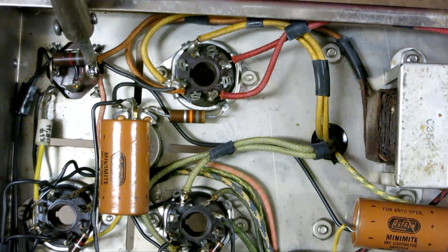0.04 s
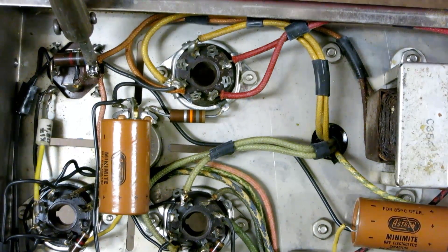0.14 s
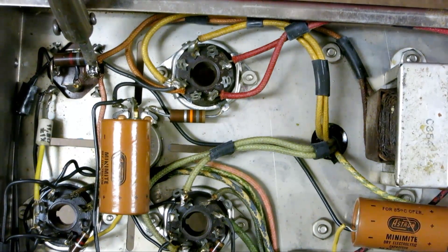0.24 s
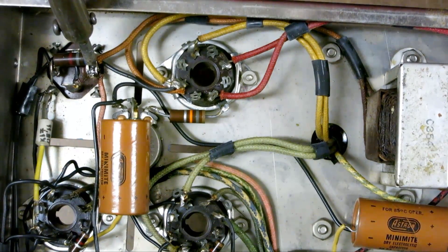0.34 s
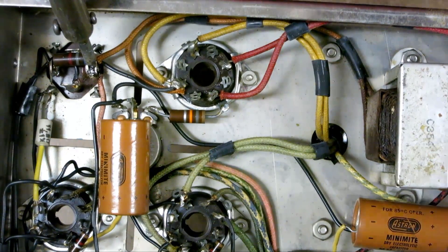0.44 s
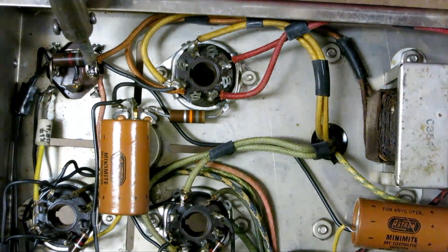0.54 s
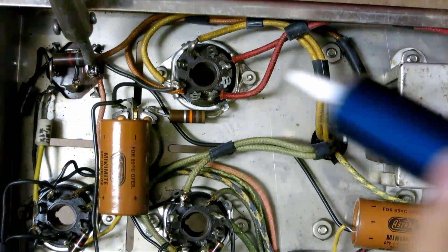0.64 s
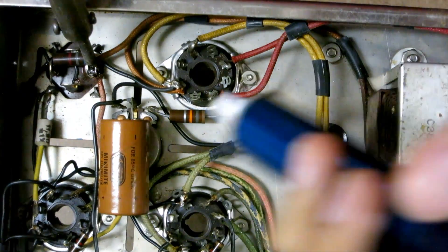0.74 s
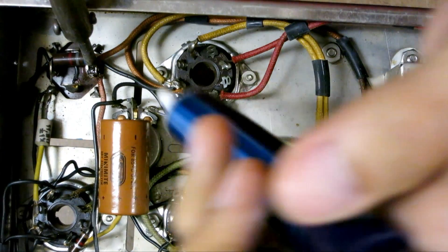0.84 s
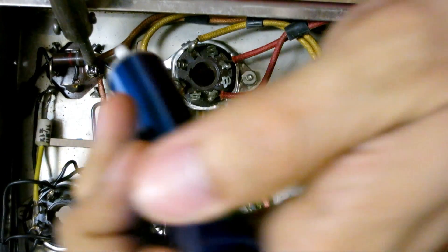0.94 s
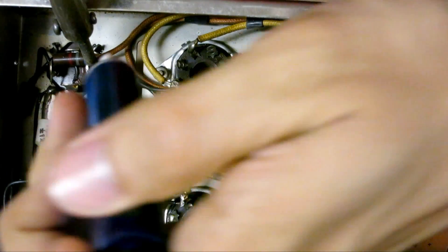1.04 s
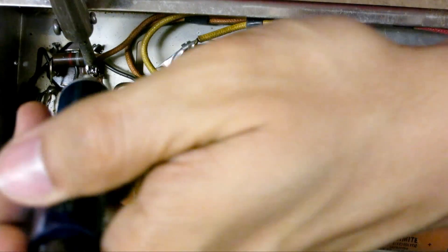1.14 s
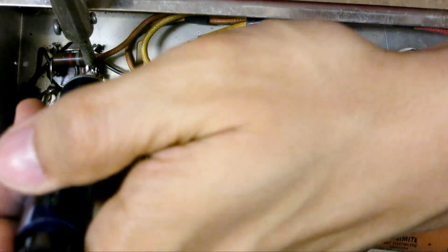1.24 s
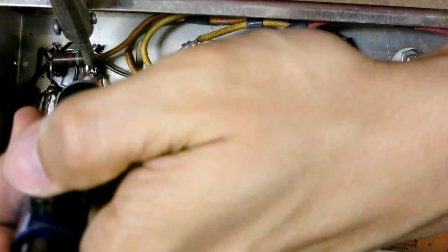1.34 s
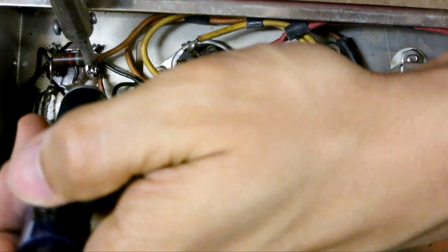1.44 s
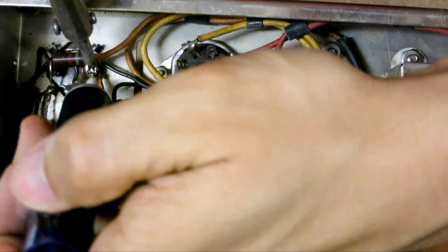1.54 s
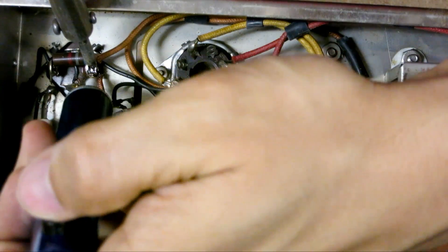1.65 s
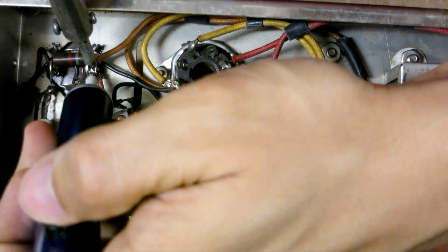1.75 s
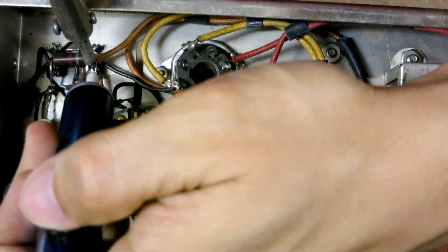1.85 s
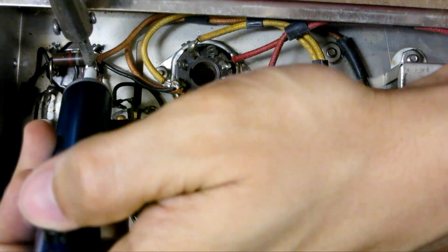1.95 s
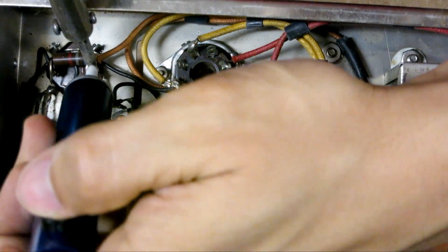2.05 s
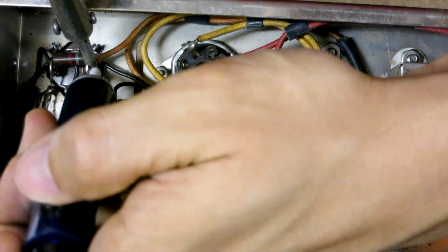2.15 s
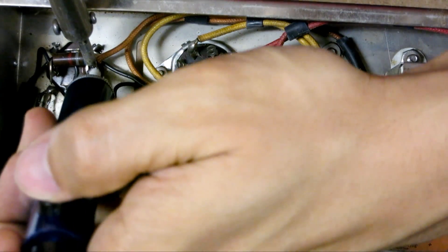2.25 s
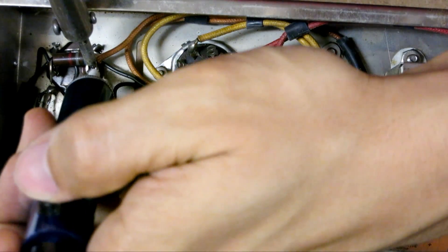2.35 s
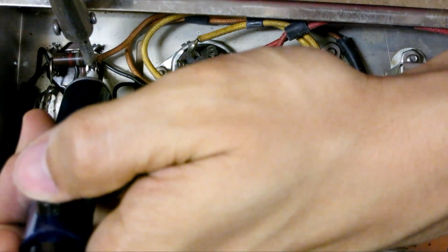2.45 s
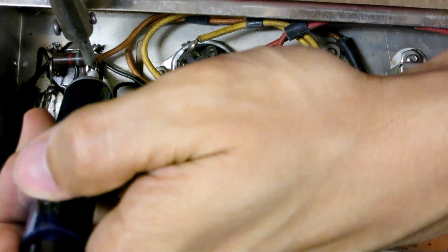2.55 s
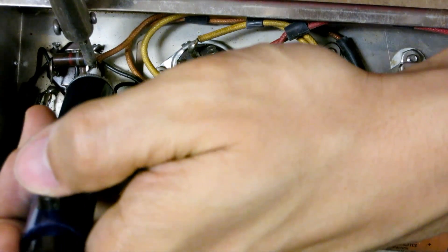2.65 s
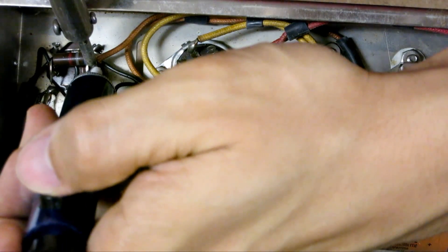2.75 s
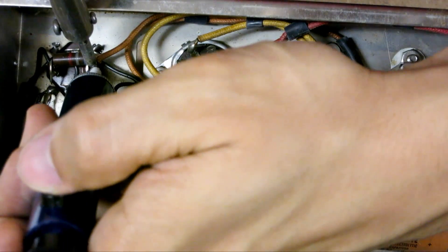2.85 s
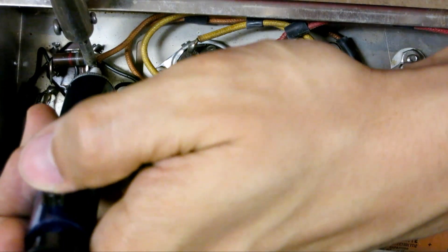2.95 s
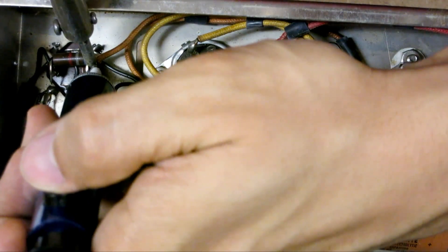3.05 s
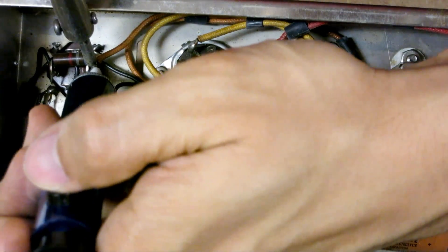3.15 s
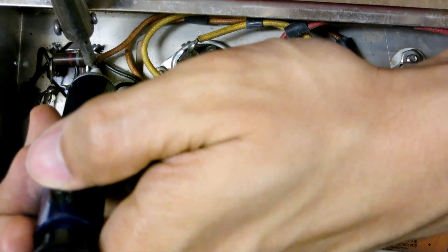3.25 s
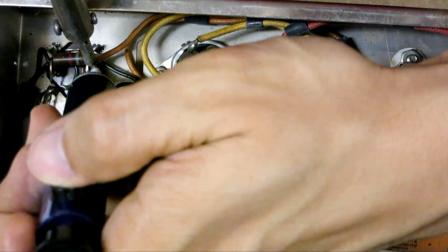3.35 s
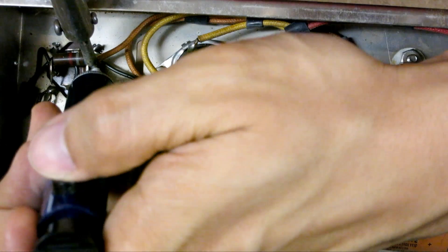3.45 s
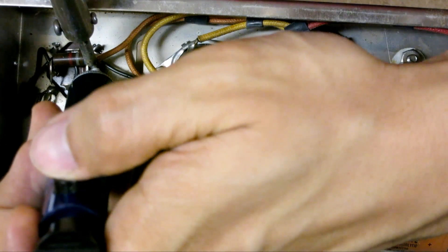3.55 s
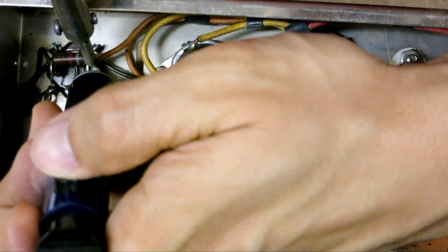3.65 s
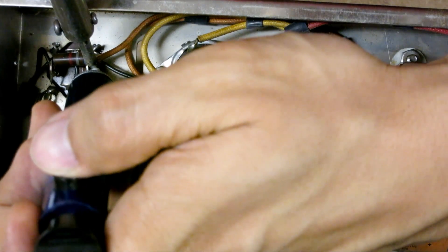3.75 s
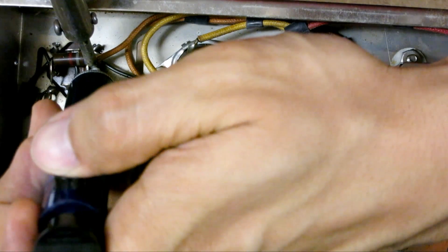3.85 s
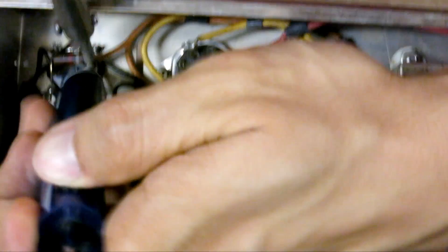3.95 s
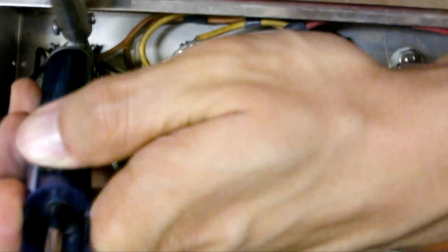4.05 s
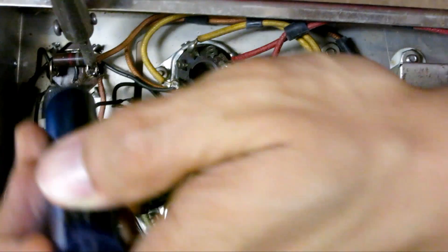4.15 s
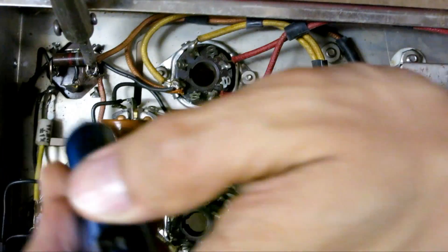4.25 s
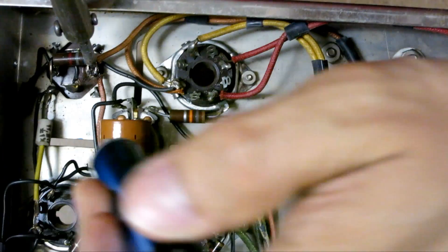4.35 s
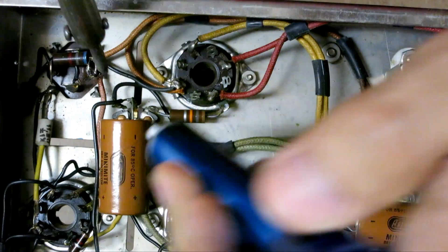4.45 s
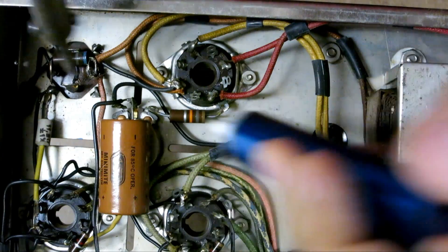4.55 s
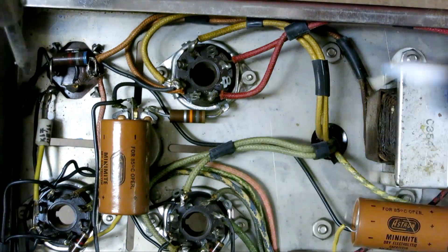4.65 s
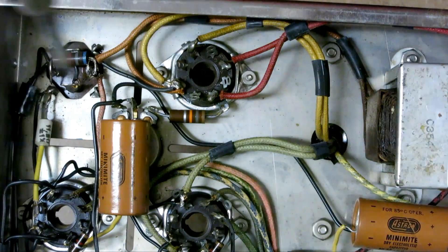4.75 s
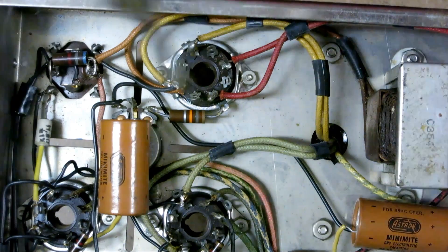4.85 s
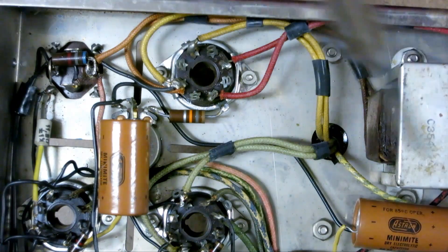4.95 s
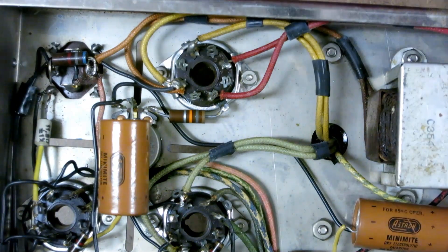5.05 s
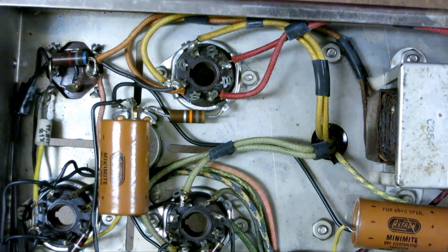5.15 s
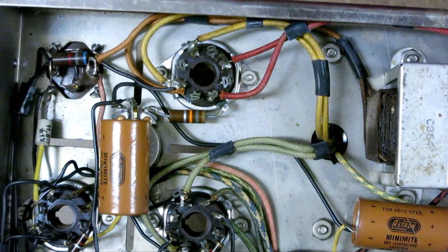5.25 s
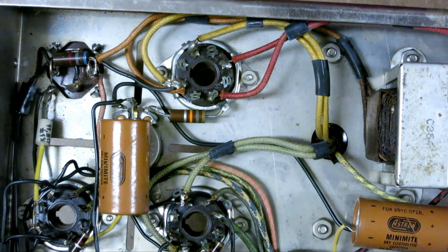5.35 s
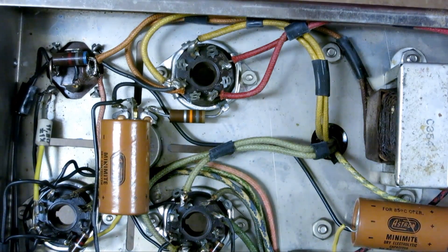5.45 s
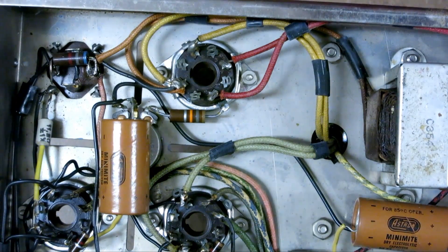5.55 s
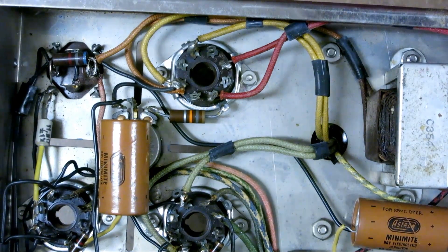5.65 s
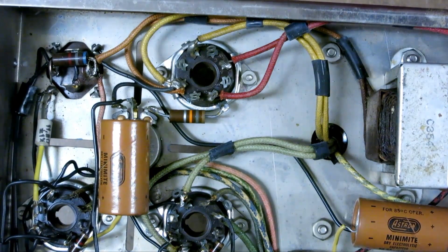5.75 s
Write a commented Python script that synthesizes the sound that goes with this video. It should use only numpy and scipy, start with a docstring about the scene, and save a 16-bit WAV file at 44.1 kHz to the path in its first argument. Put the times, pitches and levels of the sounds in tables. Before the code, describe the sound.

Low room hush with fine hiss, a metallic tap, then two and a half seconds of tiny ticks from a focusing lens. The pump snaps once, far louder than everything else, with a faint shimmering spring tail. The background dips briefly, loose parts rattle, and quiet clicks, rustling and delicate ticks finish it. Very close microphone, barely any room.

```python
"""Desoldering pump at close range

A spring-loaded pump on a hot joint in a metal chassis fires once. Contacts are decaying noise and modal rings;
the piston's scrape is shaped noise, its stop one pressure swing, and the spring a set of close modes.
Before and after come lens ticks as a camera hunts for focus, faint scattered ticks, taps, clatter, rustles, a tone.
Workshop hush is shaped noise, a faint diffuse tail is the room, and the gain ducks at the snap."""
import sys
import numpy as np
from scipy import signal
from scipy.fft import rfft, irfft, next_fast_len
from scipy.io import wavfile
from scipy.ndimage import uniform_filter1d

SR = 44100
rng = np.random.default_rng(int(sys.argv[2]) if len(sys.argv) > 2 else 0)


def wav_out(sig):
    """Save sig, one row per channel (or a flat mono array), as 16-bit PCM at SR to the path in sys.argv[1]."""
    wavfile.write(sys.argv[1], SR, np.round(np.clip(np.atleast_2d(sig).T, -1, 1) * 32767).astype(np.int16))


N = 255603
TIME = np.arange(N) / SR

# Workshop hush, louder while the hand is close: t/s, level/dB
HUSH_LEVEL = [(0.3, -65.5), (0.6, -64), (1.25, -62.5), (1.7, -60), (3.948, -59), (4.251, -65.5),
              (5.35, -66.5), (5.8, -63.5)]
# Relative spectral density of the low hush and of the fine hiss: f/Hz, density/(dB per Hz)
HUSH_SPECTRUM = [(25, -19.5), (50, -2), (85, 2), (190, -4), (290, -3.5), (550, -7), (720, -9),
                 (1220, -12.5), (1600, -16), (2000, -16), (2700, -23), (3050, -24), (3300, -28),
                 (8000, -34.5)]
HISS_SPECTRUM = [(1000, -18.5), (3300, -9.5), (5000, -5.5), (9000, -6.5), (14000, -7.5), (15700, -17),
                 (16200, -31)]
# Narrow humps in the hush: f/Hz, width at half amplitude/Hz, level before the swell/dB
HUSH_HUMPS = [(79, 74, -79), (265, 69, -86.5), (976, 44, -80.5), (1236, 120, -77), (2937, 90, -85)]
# Steps of the focusing lens: t/s, peak of housing ring/dB, tilt/(dB per octave), gear bite re peak/dB
FOCUS_STEPS = [(0.418, -48.5, -1, -14), (1.254, -48, 4.5, -12), (1.421, -46.5, 2.5, -13),
               (1.5456, -38.5, -6.5, -15), (1.67, -42.5, 2, -14), (1.921, -38, 1.5, -19),
               (2.046, -35.5, -5, -14.5), (2.213, -33.5, -5, -14), (2.379, -34, -1.5, -12.5),
               (2.5057, -39, 3, -22), (2.6718, -42, 4, -10), (2.839, -42, 3, -15), (3.006, -40.5, 0, -20),
               (3.1721, -39, 2, -22), (3.298, -47.5, -6, -16), (3.423, -43.5, -4.5, -8),
               (3.84, -46, 4.5, -10), (3.964, -47.5, 6, -12), (4.417, -47.5, 4.5, -22),
               (4.923, -45, -5, -12.5), (5.417, -42.5, -2, -11), (5.507, -46.5, 3, -15),
               (5.591, -42, -4, -14)]
# Modes of the lens housing before tilt and scatter: f/Hz, relative level/dB, T60/s
LENS_MODES = [(555.4, -15, 0.047), (796, 0.5, 0.049), (960, -3, 0.052), (1152, 5, 0.018),
              (1364, -2.5, 0.029), (1566, -10.5, 0.014), (1974, -2, .028), (2998, -22, 0.014),
              (3450, -21, .018), (3950, -19, 0.014), (4217, -18.5, 0.014), (6400, -21, 0.0069)]
# Relative spectrum of the room's answer: f/Hz, level/dB
ROOM_SPECTRUM = [(80, 9), (200, -1), (320, 7), (420, 3.5), (900, 0.5), (1800, -1), (2600, 0), (3400, -5),
                 (4400, -5), (5200, 0), (5900, -3), (6700, 0), (7800, 0.5), (9000, -2), (10400, -3),
                 (12500, -3), (14600, -1), (15800, -12.5)]
# Reverberation time of the room: f/Hz, T60/s
ROOM_T60 = [(100, .7), (500, .45), (2000, .42), (5000, .46), (8000, .42), (15000, .36)]
# Knocks on the chassis: t/s, peak level of the ring/dB
KNOCKS = [(0.4305, -36), (5.425, -48)]
# Modes of the chassis sheet metal: f/Hz, relative level/dB, T60/s
CHASSIS_MODES = [(209, -13, .12), (274, -12, 0.15), (379, -8.5, 0.14), (621, -8, 0.11), (755, -9.5, 0.12),
                 (1010, -4, 0.1), (1620, 1, .045), (1840, 0.5, 0.03), (2430, -4, 0.053), (3380, -47, 0.023),
                 (4000, -18.5, 0.071), (7400, -22, .05)]
# Light taps of finger, nozzle and iron on the pump, wires and lugs:
# t/s, approximate peak level/dB, strongest f/Hz, spread/octaves, T60/s
TAPS = [(0.4335, -44, 1700, .1, .03), (0.4345, -46, 2470, 0.042, 0.033), (0.4375, -44, 800, 0.41, .04),
        (5.428, -49, 2600, 0.46, 0.018), (5.563, -53, 2500, .25, .04), (5.574, -52, 4800, .5, .03),
        (0.7306, -53, 5500, 0.54, 0.11), (0.731, -51, 8330, .07, .06), (3.255, -57, 2200, .6, 0.024),
        (3.274, -48, 1500, 0.6, .04), (3.311, -47, 1200, 0.45, 0.027), (3.351, -53, 3000, 1.2, .012),
        (3.913, -27.5, 7900, 0.93, 0.0059), (3.914, -38.5, 1950, 0.62, 0.013), (4.04, -45, 7000, 1, .008),
        (4.059, -36, 7000, 1, .01), (4.122, -40.5, 9160, 0.55, 0.012), (4.365, -51, 9520, 0.54, 0.026),
        (4.388, -49.5, 9500, 0.5, 0.018), (4.418, -54, 7400, .2, 0.024), (4.429, -55, 11970, 0.42, .006),
        (4.445, -55, 11100, .4, 0.013), (4.592, -49, 7000, 0.73, 0.014), (5.4243, -42, 1000, 0.39, 0.039),
        (5.4172, -47, 3000, 1.6, 0.029), (5.6204, -52, 6050, 0.28, 0.047), (5.6625, -48, 7300, .6, .022),
        (5.682, -51, 13500, .4, .015), (5.6985, -46.5, 6200, 0.27, 0.043), (5.699, -53, 13000, .4, .04),
        (5.7296, -45, 6800, 0.38, 0.012), (5.7452, -43.5, 8000, 0.94, 0.064),
        (5.756, -45, 12000, 0.23, 0.054)]
# Modes of the nozzle as it leaves the lug: f/Hz, relative level/dB, T60/s
NOZZLE_MODES = [(590, -15, 0.025), (2380, -3, .015), (2770, 1, .016), (4240, -9, .014), (5100, -1, 0.013),
                (5550, -1.5, .014), (6860, -12, .012)]
# Clatter of the loose pump as it is lifted away: t/s, approximate peak level/dB, tilt/(dB per octave), T60/s
CLATTERS = [(4.189, -46, -2, .015), (4.1943, -34, 2, .011), (4.2056, -35, 1, 0.011),
            (4.2836, -34.5, 2.5, 0.013), (4.307, -47, -2, .012), (4.822, -47.5, 1.5, 0.012)]
# Relative spectral density of the clatter before tilt: f/Hz, density/(dB per Hz)
CLATTER_SPECTRUM = [(1000, -22), (1900, -2), (2800, -2.5), (3500, -7), (4400, 1), (5400, 3.5), (6300, -1),
                    (7500, -5), (9200, -4), (10800, -15), (13000, -14), (15000, -24)]
# Soft rustles as tools are handled: middle t/s, length/s, level/dB
RUSTLES = [(0.53, 0.092, -70), (0.83, 0.11, -73), (1.35, 0.058, -69), (4.414, .02, -60.5),
           (4.74, 0.13, -72.5), (4.875, 0.02, -69), (5.06, 0.093, -76), (5.46, 0.13, -73),
           (5.571, 0.036, -60.5), (5.66, 0.36, -63.5), (5.762, 0.033, -67.5)]
# Relative spectral density of the rustles: f/Hz, density/(dB per Hz)
RUSTLE_SPECTRUM = [(300, -3), (1500, -2), (2600, 0), (3400, -6), (4800, -2.5), (6500, -3), (10000, -4),
                   (14000, -4), (15500, -8.5)]
# Fingers sliding on the barrel:
# middle t/s, length/s, level/dB, f at the middle/Hz, glide/(octaves per s), bandwidth of each pole/Hz
FINGER_RUBS = [(.54, .08, -78, 11500, 0, 2500), (0.828, .05, -77, 4100, 1, 700),
               (.835, .06, -72.5, 10100, -1, 1200), (.825, .07, -76, 13200, 0, 600),
               (1.35, .06, -75, 9800, 0, 1800), (1.365, .04, -78, 13400, 0, 600),
               (4.734, 0.081, -76, 8040, -.5, 400), (4.876, 0.026, -73, 9000, 0, 351),
               (5.06, .1, -76, 13000, 0, 2500)]
# Soft swells of low noise: middle t/s, length/s, level/dB
LOW_SWELLS = [(0.774, 0.23, -67), (1.505, 0.077, -60.5), (1.68, 0.21, -61), (3.547, 0.018, -54.5),
              (5.045, 0.89, -71.5)]
# Steps in which the lens drive whines: t/s, level/dB
DRIVE_WHINES = [(1.422, -59), (1.926, -54), (2.51, -59), (2.672, -56), (2.84, -54)]
# Modes of the lens drive before scatter: f/Hz, relative level/dB, T60/s
DRIVE_MODES = [(1930, 2, .02), (3350, -4, 0.0076), (3947, -1, 0.014), (5280, -1.5, .012),
               (6380, -2.5, 0.015), (8070, -4, .01)]
# Contacts inside the pump, from the latch to the last bounce:
# t/s, rattle level/dB, strongest f/Hz, spread/octaves, rattle T60/s, gain of barrel ring/dB
PUMP_CONTACTS = [(3.9842, -6, 9000, .6, .003, -24), (3.9876, -3.5, 9600, .1, .004, -16),
                 (3.9878, -8, 4450, .12, .005, -21), (3.9935, -17, 1900, .4, .005, -25),
                 (3.9984, -15, 2850, .22, .005, -20), (3.9987, -4, 12500, .35, .004, -23),
                 (4.0012, -13, 11000, .4, .007, -25), (4.0042, -9, 10500, .8, .005, -23),
                 (4.0146, -22, 1000, 1.2, .018, -35), (4.0152, -17.5, 8300, .28, .013, -29),
                 (4.016, -16, 5950, .07, .012, -19), (4.017, -23, 14600, .05, .012, -29)]
# Modes of barrel and piston before the contact's emphasis: f/Hz, relative level/dB, T60/s
BARREL_MODES = [(340, -20, .04), (580, -15, .04), (720, -17, .03), (1180, -8, .014), (1770, 0, .022),
                (2150, -8, .014), (2650, -4, .018), (4380, -3, .011), (5970, -2, .016), (7750, -3, .014),
                (9250, -3, .01), (10150, -2, .014), (12300, -5, .008), (14650, -1, .016)]
# Relative spectral density of scrape and rushing air: f/Hz, density/(dB per Hz)
SCRAPE_SPECTRUM = [(60, -8), (220, -9), (320, -2), (420, -7), (600, -4), (850, -14), (1150, -2), (1450, -5),
                   (1770, 2), (2300, -5), (2650, 0), (3650, -12), (4350, 0), (5050, -6), (5950, 2),
                   (6700, -11), (7750, 3), (8500, 0), (10100, 3), (11400, -7), (12400, -1), (13300, -8),
                   (14550, 5), (15200, -6), (15900, -15)]
# The piston's dead stop: t/s, f of pressure swing/Hz, half-length to 1/e/s, level/dB
PISTON_STOP = (3.9985, 1800, .00029, -3)
# Mode clusters of the freed spring: reference f/Hz, relative level/dB, T60/s
SPRING_MODES = [(1800, -7, .6), (1953, -3.5, .7), (2300, -5.5, .5), (2500, -8.5, .5), (2640, -5, .65),
                (5930, -3.5, .6), (7560, -6.5, .45), (7770, 0, .55), (7860, -3.5, .5), (10170, -3, .45),
                (12470, -7.5, .42), (14670, -2, .42)]
# Low bumps of the bench after the recoil: t/s, level/dB, f/Hz, T60/s
BENCH_THUDS = [(4.035, -53, 68.2, .16), (4.098, -46, 133, 0.088)]


def amp(db):
    """Level definition: converts decibels to an amplitude gain."""
    return 10 ** (np.asarray(db) / 20)


def unit(x):
    """Normalization: scales a signal to rms 1."""
    return x / np.sqrt(np.mean(x ** 2) + 1e-20)


def decay(t, t60):
    """Exponential decay: amplitude falls by 60 dB in each T60."""
    return np.exp(-np.log(1000) * t / t60)


def read(points, hz):
    """Logarithmic interpolation: reads a table on a log-frequency axis."""
    f, value = np.transpose(points)
    return np.interp(np.log(hz + 1), np.log(f + 1), value)


def colour(x, points):
    """Linear filtering: multiplies the spectrum of x by a tabulated gain and returns it at rms 1."""
    size = next_fast_len(len(x))
    gain = amp(read(points, np.fft.rfftfreq(size, 1 / SR)))
    return unit(irfft(rfft(x, size) * gain, size)[:len(x)])


def add(mix, s, sound):
    """Superposition: adds a sound to the mix in place at time s, in seconds."""
    part = mix[round(s * SR):][:len(sound)]
    part += sound[:len(part)]


def emphasis(hz, centre_hz, octaves):
    """Selective excitation: a hump around the frequency that a contact excites most."""
    return 1 / (1 + (np.log2((hz + 1) / centre_hz) / octaves) ** 2)


def hump_noise(size, centre_hz, octaves):
    """Band-shaped noise: white noise weighted by one hump in frequency."""
    hump = emphasis(np.fft.rfftfreq(size, 1 / SR), centre_hz, octaves)
    return irfft(rfft(rng.standard_normal(size)) * hump, size)


def bumps(rows, edge=2):
    """Amplitude modulation: smooth swells from rows of middle t/s, length/s, level/dB."""
    return sum(amp(db) * np.exp(-abs(2 * (TIME - s) / length) ** edge) for s, length, db in rows)


def envelope(start_s, attack_s, hold_s, t60):
    """Attack and decay: a straight rise, full level until hold_s after the start, then exponential decay."""
    t = TIME - start_s
    return np.clip(t / attack_s, 0, 1) * decay(np.maximum(t - hold_s, 0), t60)


def ring(modes, length_s):
    """Modal superposition: damped sines of a struck body, neighbouring modes starting in opposite directions."""
    t = TIME[:round(length_s * SR)]
    out = np.zeros(len(t))
    for k, (hz, db, t60) in enumerate(modes):
        out += (-1) ** k * amp(db) * decay(t, t60) * np.sin(2 * np.pi * hz * t)
    return out


def rattle(noise, t60):
    """Dense impacts: noise under an exponential decay, with a peak of about 1."""
    fall = decay(TIME[:len(noise)], t60)
    return .5 * unit(noise * fall) * np.sqrt(np.mean(fall ** 2))


def crack(centre_hz, octaves, t60, size=4096):
    """Broadband contact: the dense, quickly dying rattle of a hard contact, with a peak of about 1."""
    return rattle(hump_noise(size, centre_hz, octaves), t60)


def hush(hiss_db=-12, hiss_follow=0.83, waver_db=1):
    """Ambient noise: low room noise with narrow humps, and a fine hiss that follows part of its slow swell."""
    s, db = np.transpose(HUSH_LEVEL)
    swell_db = np.interp(TIME, s, db) - db.mean()
    waver = np.interp(TIME, np.linspace(0, TIME[-1], 60), rng.standard_normal(60))
    size = next_fast_len(N)
    hz = np.fft.rfftfreq(size, 1 / SR)
    humps = np.zeros(len(hz))
    for centre_hz, width_hz, hump_db in HUSH_HUMPS:
        humps += amp(hump_db) * unit(1 / (1 + (2 * (hz - centre_hz) / width_hz) ** 2))
    low = amp(db.mean()) * colour(rng.standard_normal(N), HUSH_SPECTRUM)
    low += irfft(rfft(rng.standard_normal(size)) * humps, size)[:N]
    hiss_gain = amp(db.mean() + hiss_db + hiss_follow * swell_db)
    hiss = hiss_gain * colour(rng.standard_normal(N), HISS_SPECTRUM)
    return low * amp(swell_db + waver_db * waver) + hiss


def lens(stop_s=.0042, stop_share=0.5, tick_db=-19, bite_hz=3500, bite_t60=.018,
         knock_db=-10, knock_hz=1000, knock_t60=0.018):
    """Impulsive excitation: each step kicks the housing at start and stop, gears bite, the mount rattles dully."""
    out = np.zeros(N)
    scatter_db, detune = 1.5, .012  # standard deviations; detune is a fraction of pitch
    for s, db, tilt_db, bite_db in FOCUS_STEPS:
        pitch = 1 + detune * rng.standard_normal()
        modes = []
        for hz, mode_db, t60 in LENS_MODES:
            shift_db = tilt_db * np.log2(hz / 1000) + scatter_db * rng.standard_normal()
            modes.append((hz * pitch, mode_db + shift_db, t60))
        kick = ring(modes, length_s=.08)
        step = kick.copy()
        add(step, stop_s, stop_share * kick)
        add(out, s, amp(db) * step / abs(step).max())
        add(out, s, amp(db + tick_db) * crack(3600, 0.91, .025))
        add(out, s, amp(db + bite_db) * crack(bite_hz, 0.31, bite_t60))
        add(out, s, amp(db + knock_db) * crack(knock_hz, 0.64, knock_t60))
    return out


def room(x, build_s=0.0019):
    """Reverberation: convolution with a diffuse tail that builds quickly, each band dying at its own speed."""
    hz, t, bands = signal.stft(rng.standard_normal(SR), SR, nperseg=256)
    bands = bands * amp(read(ROOM_SPECTRUM, hz))[:, None] * decay(t, read(ROOM_T60, hz)[:, None])
    tail = signal.istft(bands, SR, nperseg=256)[1][:SR]
    tail = tail * (1 - np.exp(-TIME[:SR] / build_s))
    return signal.fftconvolve(x, tail / np.linalg.norm(tail))[:N]


def clatter(tilt_db, t60, size=4096):
    """Multiple impacts: loose pump parts rattle as tilted, decaying noise, with a peak of about 1."""
    spectrum = [(hz, db + tilt_db * np.log2(hz / 1000)) for hz, db in CLATTER_SPECTRUM]
    return rattle(colour(rng.standard_normal(size), spectrum), t60)


def tools(knock_crack_db=-6, knock_hz=1700, knock_t60=0.012, nozzle_s=4.2055, nozzle_db=-28.5):
    """Struck bodies: knocks ring the chassis, the nozzle rings, loose parts clatter; light taps only crack."""
    out = np.zeros(N)
    chassis = ring(CHASSIS_MODES, length_s=.5)
    for s, db in KNOCKS:
        add(out, s, amp(db) * chassis / abs(chassis).max())
        add(out, s, amp(db + knock_crack_db) * crack(knock_hz, 0.37, knock_t60))
    nozzle = ring(NOZZLE_MODES, length_s=.5)
    add(out, nozzle_s, amp(nozzle_db) * nozzle / abs(nozzle).max())
    for s, db, tilt_db, t60 in CLATTERS:
        add(out, s, amp(db) * clatter(tilt_db, t60))
    for s, db, hz, octaves, t60 in TAPS:
        add(out, s, amp(db) * crack(hz, octaves, t60))
    return out


def rustle(slips_per_s=4000, spread_db=1.5, catch_db=3.0, catch_s=.005):
    """Stick-slip friction: tiny uneven slips cluster as hands and tools slide, catching and letting go."""
    knots = np.arange(0, N / SR + catch_s, catch_s)
    catching = amp(catch_db * np.interp(TIME, knots, rng.standard_normal(len(knots))))
    sizes = amp(spread_db * np.minimum(rng.exponential(1, N), 4))
    happens = rng.random(N) < slips_per_s / SR
    slips = rng.standard_normal(N) * sizes * happens
    # edge: 1 would be a spike, 2 a bell
    return bumps(RUSTLES, edge=1.14) * colour(slips * catching, RUSTLE_SPECTRUM)


def rubs():
    """Resonant friction: skin sliding on the barrel is noise in one resonance that glides as the grip shifts."""
    out = np.zeros(N)
    reach_s = .2  # rendered time on each side of the middle
    t = np.arange(-reach_s, reach_s, 1 / SR)
    for s, length, db, hz, glide, width in FINGER_RUBS:
        pole = np.exp(-np.pi * width / SR)
        noise = rng.standard_normal(len(t)) + 1j * rng.standard_normal(len(t))
        narrow = signal.lfilter([1], [1, -2 * pole, pole * pole], noise)  # a double pole at 0 Hz
        phase = 2 * np.pi * np.cumsum(hz * 2 ** (glide * t)) / SR
        hiss = (narrow * np.exp(1j * phase)).real  # moved up to the gliding frequency
        add(out, s - reach_s, amp(db) * np.exp(-(2 * t / length) ** 2) * unit(hiss))
    return out


def swells(centre_hz=300, octaves=0.16):
    """Modulated noise: a low band of noise rises softly now and then."""
    return unit(hump_noise(N, centre_hz, octaves)) * bumps(LOW_SWELLS)


def small_ticks(tick_db=-60, spread_db=3.0, tick_hz=4600, count=60, start_s=1.25, end_s=3.85):
    """Random impulses: faint, scattered small ticks between the larger lens steps."""
    out = np.zeros(N)
    for when, size, pitch in rng.random((count, 3)):
        tick = crack(tick_hz * 2 ** (pitch - .5), .55, .01)  # up to half an octave either way
        level_db = tick_db + spread_db * min(-np.log(size), 2)
        add(out, start_s + when * (end_s - start_s), amp(level_db) * tick)
    return out


def drive(nudge_db=-56.0, spread_db=1.5, scatter_db=2.5, nudges_per_s=23.99, whine_hz=4260, whine_half_s=0.0015):
    """Periodic excitation: steady small nudges tick the lens drive, which whines in some of the big steps."""
    whines = bumps([(s, 2 * whine_half_s, db) for s, db in DRIVE_WHINES])
    out = whines * np.sin(2 * np.pi * whine_hz * TIME)
    for s in np.arange(1.2544, 3.86, 1 / nudges_per_s):
        modes = [(hz, db + scatter_db * rng.standard_normal(), t60) for hz, db, t60 in DRIVE_MODES]
        tick = ring(modes, length_s=.03)
        add(out, s, amp(nudge_db + spread_db * rng.standard_normal()) * tick / abs(tick).max())
    return out


def barrel(centre_hz, octaves):
    """Modal excitation: the barrel's ring after a contact that favours the modes near centre_hz."""
    modes = [(hz, db + 20 * np.log10(emphasis(hz, centre_hz, octaves)), t60) for hz, db, t60 in BARREL_MODES]
    return ring(modes, length_s=.05)


def scrape(start_db=-22, speed_up_db=2, leak_db=-18.5, leak_t60=0.093):
    """Sliding friction: the piston's scrape grows with its speed, then dies fast while a little air leaks on."""
    start_s = PUMP_CONTACTS[0][0]  # the latch
    attack_s, stroke_s, stroke_t60 = .001, .02, .017
    travel = np.clip((TIME - start_s) / stroke_s, 0, 1)
    rub = envelope(start_s, attack_s, stroke_s, stroke_t60)
    leak = amp(leak_db) * envelope(start_s, attack_s, stroke_s, leak_t60)
    low_cut = signal.butter(2, 200, "highpass", fs=SR, output="sos")
    noise = signal.sosfilt(low_cut, colour(rng.standard_normal(N), SCRAPE_SPECTRUM))
    return amp(start_db + speed_up_db * travel) * np.maximum(rub, leak) * noise


def spring(cluster_hz=130, count=10):
    """Beating of close modes: the coils ring in narrow clusters, so the ring shimmers."""
    modes = []
    for hz, db, t60 in SPRING_MODES:
        for _ in range(count):
            modes.append((hz + cluster_hz * rng.uniform(-0.79, 1), db, t60))
    return ring(modes, length_s=.5) / np.sqrt(count)


def pump(slam_ring_db=-27, slam_octaves=0.42, spring_db=-56, thump_db=-44, thump_hz=84):
    """Impact and friction: contacts ring the barrel, the piston scrapes and stops dead, and the spring rings on."""
    out = scrape()
    for s, db, hz, octaves, t60, ring_db in PUMP_CONTACTS:
        add(out, s, amp(ring_db) * barrel(hz, octaves))
        add(out, s, amp(db) * crack(hz, octaves, t60))
    # the dead stop jerks the whole barrel: one strong swing of pressure
    stop_s, push_hz, push_s, push_db = PISTON_STOP
    t = TIME - stop_s
    out -= amp(push_db) * np.cos(2 * np.pi * push_hz * t) * np.exp(-(t / push_s) ** 2)
    add(out, stop_s, amp(slam_ring_db) * barrel(push_hz, slam_octaves))
    add(out, stop_s, amp(spring_db) * spring())
    # the recoil thumps the bench through the nozzle
    add(out, PUMP_CONTACTS[0][0], ring([(thump_hz, thump_db, .36)], length_s=.5))
    for s, db, hz, t60 in BENCH_THUDS:
        add(out, s, ring([(hz, db, t60)], length_s=.5))
    return out


def tone(start_s=5.0, end_hz=560, sag_hz=35, sag_s=0.039, level_db=-65, rough=0.44, blur_hz=35):
    """Quadrature modulation: slow noise blurs a faint, brief tone that sinks towards end_hz."""
    hz = end_hz + sag_hz * np.exp(-np.maximum(TIME - start_s, 0) / sag_s)
    shape = envelope(start_s, attack_s=0.022, hold_s=0.064, t60=0.45)
    blur = signal.butter(2, blur_hz, fs=SR, output="sos")
    a, b = unit(signal.sosfilt(blur, rng.standard_normal((2, N))))
    phase = 2 * np.pi * np.cumsum(hz) / SR
    blurred = (1 + rough * a) * np.sin(phase) + rough * b * np.cos(phase)
    return amp(level_db) * shape * unit(blurred)


def mid_swell(middle_s=5.04, length_s=0.13, db=-66, centre_hz=1100):
    """Modulated noise: the room noise swells once in the middle range."""
    return unit(hump_noise(N, centre_hz, 0.83)) * bumps([(middle_s, length_s, db)])


def scene(pump_room_db=-20, tools_room_db=-21):
    """Direct and diffuse sound: every source is close to the microphone, so the room is faint."""
    snap = pump()
    small = tools() + lens() + drive() + small_ticks()
    wet = room(amp(pump_room_db) * snap + amp(tools_room_db) * small)
    handling = rustle() + rubs()
    background = hush() + swells() + mid_swell() + tone()
    return (snap + small + wet + handling + background)[None]


def record(dry, threshold_db=-32, recover_db_per_s=19, most_db=9, low_cut_hz=30, attack_s=0.065, edge_hz=15800):
    """Dynamic compression: after a bass cut, gain sinks when power is high and creeps back; then a band limit."""
    x = signal.sosfilt(signal.butter(2, low_cut_hz, "highpass", fs=SR, output="sos"), dry)
    power = uniform_filter1d(x[0] ** 2, size=400)  # about 9 ms
    power_db = 10 * np.log10(abs(power) + 1e-12)
    # peak hold that sinks at a steady rate
    fall_db = TIME * recover_db_per_s
    held_db = np.maximum.accumulate(power_db + fall_db) - fall_db
    over_db = np.clip(held_db - threshold_db, 0, most_db)
    pole = np.exp(-1 / (attack_s * SR))
    ducked = x / amp(signal.lfilter([1 - pole], [1, -pole], over_db))
    band_limit = signal.firwin(255, edge_hz, window=("kaiser", 9), fs=SR)
    return signal.oaconvolve(ducked, band_limit[None], "same")


dry = scene()
out = record(dry)
wav_out(out)
```